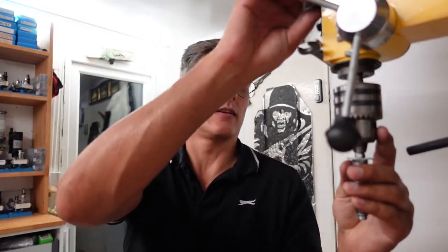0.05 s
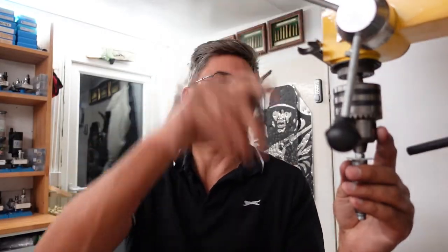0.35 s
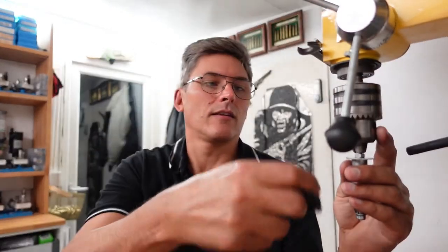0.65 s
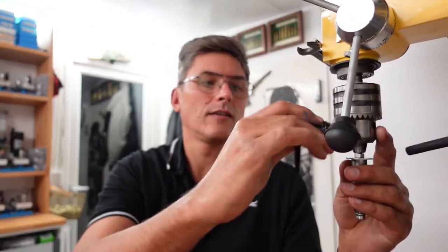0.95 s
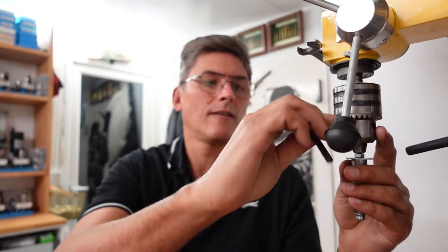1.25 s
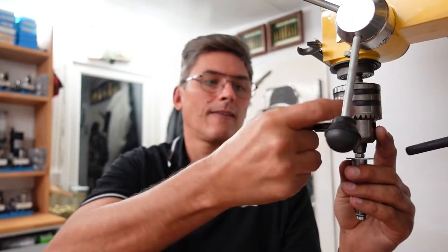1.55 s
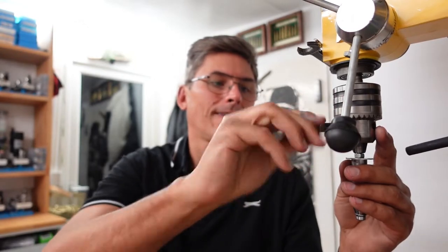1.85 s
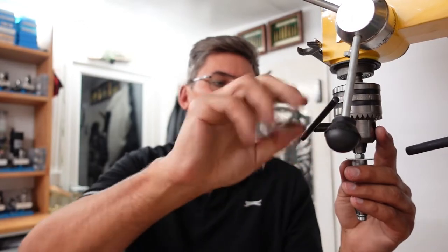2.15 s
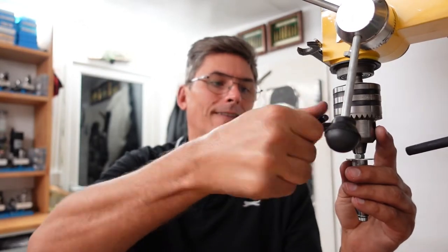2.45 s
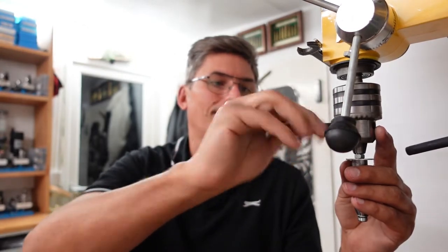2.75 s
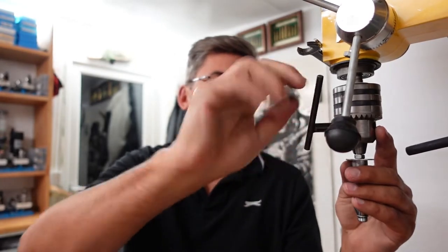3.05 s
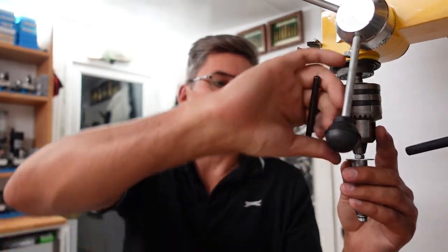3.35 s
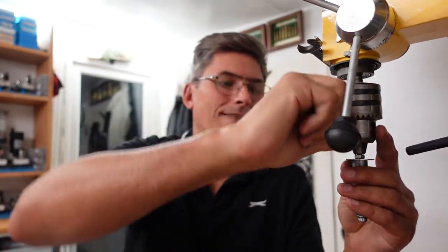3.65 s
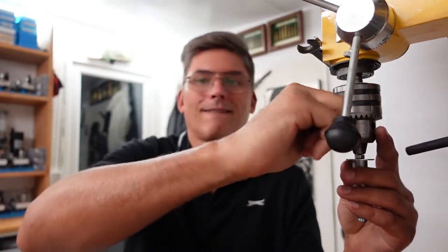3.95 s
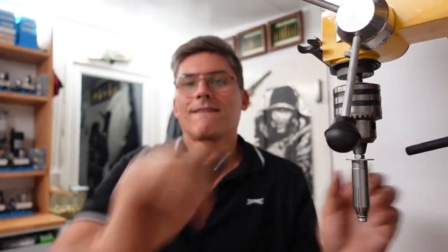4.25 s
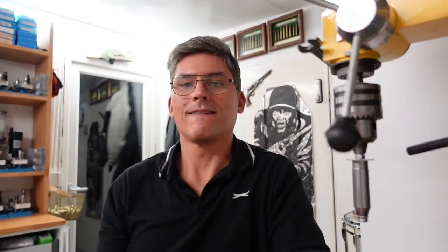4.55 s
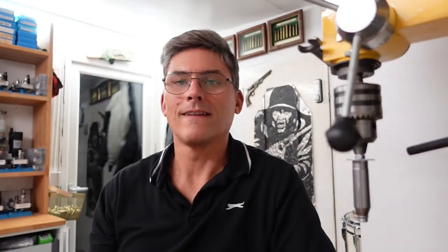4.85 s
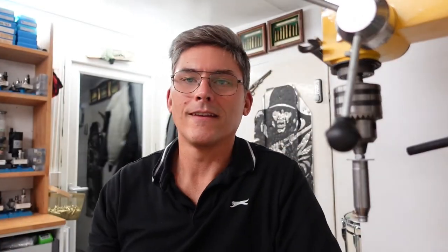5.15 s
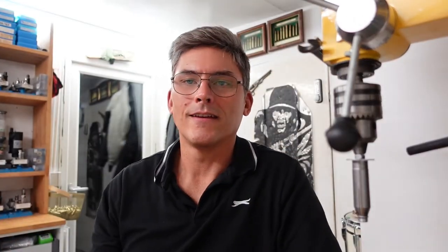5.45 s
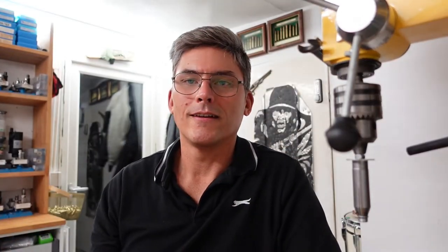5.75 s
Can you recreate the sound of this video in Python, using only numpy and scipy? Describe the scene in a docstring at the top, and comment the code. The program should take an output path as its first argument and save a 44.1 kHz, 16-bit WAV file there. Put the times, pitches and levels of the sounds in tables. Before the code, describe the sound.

In a small workshop with a faint hum, a metal handle clacks, then a drill chuck is tightened by hand close to the microphone. Bright, ringing clicks of the steel key come in uneven bursts over dull knocks from the machine, growing heavier and duller with the last turns. The key scrapes briefly, and hands settle with a soft thump and a brush of clothing.

```python
"""A steel key clicks and rings against the teeth of a drill press chuck, tightening it turn by turn.
Each impact excites damped modes of key and chuck, duller as the jaws grip the bolt; the key's pin
scrapes in its socket, and the machine's head thuds under each push. The feed handle clacks at the
start; near the end a hand slides on the key, and later cloth brushes as the hands settle. The walls
of the small workshop answer briefly, over still air and a faint hum."""
import sys
import numpy as np
from scipy import signal
from scipy.fft import rfft, irfft, next_fast_len
from scipy.io import wavfile
from scipy.ndimage import uniform_filter1d

SR = 44100
rng = np.random.default_rng(int(sys.argv[2]) if len(sys.argv) > 2 else 0)


def dump(signal):
    """Clip the signal to [-1, 1] and save it as 16-bit WAV at the path in sys.argv[1]."""
    limited = np.clip(np.atleast_2d(signal).T, -1, 1)
    pcm = np.round(limited * 32767).astype(np.int16)
    wavfile.write(sys.argv[1], SR, pcm)


N = 260222
TIME = np.arange(N) / SR  # the whole scene [s]
T = np.arange(SR // 2) / SR  # one event [s]

# Levels in all tables are relative: each source adds its own gain.
# the key's teeth strike the chuck's: (time [s], click level [dB], chatter [s], ring level [dB])
TOOTH_STRIKES = [ (1.0332, -17, .005, -25.5), (1.0515, -14, 0.005, -10), (1.1777, -14.5, 0.0042, -22),
                 (1.1873, -13, 0.003, -15.5), (1.2983, -27, 0.00095, -43), (1.3376, -35.5, 0.0046, -60),
                 (1.3635, -16, 0.0069, -14), (1.3752, -14.5, 0.0027, -13.5), (1.4025, -21, 0.0035, -13.5),
                 (1.4474, -16.5, .005, -20.5), (1.468, -8, 0.0027, -33), (1.4811, -15.5, 0.011, -18),
                 (1.5018, -19, 0.0077, -12.5), (1.5162, -11.5, 0.0056, -16.5),
                 (1.5274, -21.5, 0.00084, -19), (1.882, -18.5, 0.0048, -18), (1.8954, -17.5, 0.0013, -17),
                 (1.92, -19.5, 0.0035, -20), (1.94, -16.5, 0.0024, -22), (1.9584, -11, 0.00046, -11.5),
                 (2.136, -39.5, .003, -70), (2.301, -25, 0.0016, -37), (2.324, -14.5, 0.0013, -23),
                 (2.3448, -13.5, 0.0024, -31), (2.3665, -17, 0.0038, -17.5), (2.517, -21.5, 0.0018, -42),
                 (2.7156, -28.5, 0.0023, -45), (2.7741, -23, 0.004, -19), (2.7981, -18.5, 0.0034, -19.5),
                 (2.8219, -19, 0.0069, -18.5), (3.215, -34.5, 0.0024, -55), (4.0815, -26, 0.0038, -32.5)]
# the jaws bite into the bolt, ending each of the last turns: (time [s], clunk level [dB])
JAW_BITES = [(2.3914, -21.5), (2.8682, -19.5), (3.2254, -26), (3.2762, -30.5), (3.2943, -24.5),
             (3.3643, -30), (3.3945, -35.5)]


def amp(db):
    """Amplitude ratio of a level in decibels."""
    return 10 ** (np.asarray(db) / 20)


def unit(x):
    """Normalisation to rms 1."""
    return x / np.sqrt(np.mean(x ** 2) + 1e-20)


def along(points, hz):
    """Interpolation of (frequency, value) points on a logarithmic frequency axis."""
    freqs, values = np.transpose(points)
    return np.interp(np.log(hz + 1), np.log(freqs + 1), values)


def filtered(x, response):
    """Linear filtering: the spectrum is multiplied by a frequency response."""
    n = x.shape[-1]
    padded = next_fast_len(n + 4096)
    return irfft(rfft(x, padded) * response(np.fft.rfftfreq(padded, 1 / SR)), padded)[..., :n]


def noise(spectrum, size):
    """Spectral shaping turns white noise into coloured noise of rms 1."""
    return unit(filtered(rng.standard_normal(size), lambda hz: amp(along(spectrum, hz))))


def fade(t60, attack, hold=0):
    """Exponential damping, after a quick rise and a hold while the surfaces chatter (all in seconds)."""
    return np.exp(-np.log(1000) * np.maximum(T - hold, 0) / t60) * (1 - np.exp(-T / attack))


def burst(spectrum, t60, attack, hold=0):
    """Modal overlap: countless damped modes are heard as one dying noise."""
    return noise(spectrum, len(T)) * fade(t60, attack, hold)


def ring(modes, attack, scatter_db, stretch=1, looseness=1):
    """Modal superposition: each blow shares its energy anew, and loose contact scatters the phases."""
    hz, db, t60 = np.transpose(modes)[:, :, None]
    gain = amp(db + scatter_db * rng.standard_normal(hz.shape))
    phase = looseness * rng.uniform(-np.pi, np.pi, hz.shape)
    partials = gain * fade(t60, attack) * np.sin(2 * np.pi * hz * stretch * T + phase)
    return unit(partials.sum(axis=0)) / 10


def swells(strokes):
    """Amplitude envelope of rubbing: one Gaussian pulse for each stroke."""
    return sum(amp(db) * np.exp(-.5 * ((TIME - s) / width) ** 2) for s, db, width in strokes)


def add(track, s, sound):
    """Superposition of a sound on the track at time s."""
    start = max(round(s * SR), 0)
    part = track[..., start:start + sound.shape[-1]]
    part += sound[..., :part.shape[-1]]


def grip(s):
    """Clamping of the bolt by the jaws at time s."""
    # firmness of the hold: (time [s], grip [0-1])
    firmness = [(1.0, 0.45), (1.9, 0.28), (2.35, 0.55), (2.8, 1), (3.3, 0.6)]
    return np.interp(s, *np.transpose(firmness))


def coupled_level(s, click_db, offset_db, slope, grip_db):
    """Coupling: the level a tooth excites depends on the strength of its click and on the grip."""
    firm_click_db = -16
    return click_db + offset_db + slope * (click_db - firm_click_db) + grip_db * grip(s)


def room_tone():
    """Ambient noise floor, as mid and side: still air and a faint hum with slight phase modulation."""
    # spectrum of the still room: (frequency [Hz], level [dB])
    air = [(25, -38), (50, -26), (75, -15), (100, -3), (125, -9), (220, -5), (340, -10), (620, -11),
           (1070, -15), (2050, -19), (3800, -25.5), (8000, -30), (16000, -34)]
    waver = np.interp(TIME, np.arange(0, 7, .1), rng.standard_normal(70))
    hum = amp(-61) * np.sin(2 * np.pi * 100 * TIME + 0.52 * waver)
    return np.array([amp(-53.5) * noise(air, N) + hum, amp(-48) * noise(air, N)])


def in_room(sound, wet_db):
    """Reverberation: convolution with decaying noise adds the walls' reflections, as mid and side."""
    # reverberation time of the workshop: (frequency [Hz], t60 [s])
    walls = [(100, 0.56), (260, 0.33), (700, 0.4), (1800, 0.32), (5000, 0.32), (13000, 0.35)]
    hz, t, spectra = signal.stft(rng.standard_normal((2, len(T))), SR, nperseg=256)
    decay = np.exp(-np.log(1000) * t / along(walls, hz)[:, None])
    tail = signal.istft(spectra * decay, SR, nperseg=256)[1][:, :len(T)]
    # the column and the nearest wall answer first and strongest
    tail = tail * (1 - np.exp(-T / 0.0017)) * (1 + 1.11 * np.exp(-T / 0.011))
    tail /= np.linalg.norm(tail[0])
    mid, side = amp(wet_db) * signal.fftconvolve(sound[None], tail, axes=1)[:, :len(T)]
    return np.array([sound + mid, side])


def hands():
    """Friction and soft impact: a hand slides on the key; later cloth brushes as the hands settle."""
    # spectra of a rubbing hiss, a soft thump and rustling cloth: (frequency [Hz], level [dB])
    hiss = [(2000, -7), (4500, -7.5), (7500, -6), (10000, -4), (15000, -8.5)]
    soft_thump = [(30, -24), (55, -10), (78, 5), (150, -4), (260, -3.5), (450, -21), (900, -31),
                  (4000, -60)]
    cloth = [(250, -19), (700, 4.5), (1700, 7.5), (3500, 4.5), (6000, -1), (10000, -11), (16000, -11)]
    # a hand slides on the key, later cloth brushes: (time [s], level [dB], width [s])
    rubs = [(3.50, -48.5, 0.036), (4.82, -57, 0.2)]
    # hands come to rest on the lap: (time [s], thump level [dB], rustle level [dB], t60 [s])
    landings = [(4.614, -72, -41, 0.17), (4.724, -31, -76, 0.16), (4.752, -40, -54, 0.4),
                (4.83, -38.5, -38, 0.3)]
    out = np.zeros((2, N))
    out[0] = noise(hiss, N) * swells(rubs)
    for s, thump_db, rustle_db, t60 in landings:
        thump = amp(thump_db) * burst(soft_thump, t60, attack=0.0023)
        rustle = amp(rustle_db) * burst(cloth, t60, attack=0.0048)
        add(out, s, in_room(thump + rustle, wet_db=-6))
    return out


def pin_scrape():
    """Stick-slip friction: the key's pin moves in its socket by many tiny slips."""
    # slides of the pin: (time [s], level [dB], width [s])
    slides = [(1.17, -40, 0.015), (4.073, -41, 0.021), (4.124, -45.5, 0.021)]
    # spectrum of the scrape: (frequency [Hz], level [dB])
    friction = [(200, -31), (400, -1), (560, 6.5), (750, 5.5), (1300, -8), (1800, -2), (2350, 1),
                (3200, -10), (5000, -1.5), (7200, -8.5), (10000, -9), (16000, -17)]
    slips = np.abs(uniform_filter1d(rng.exponential(size=N) ** 4, size=40)) ** .5
    scrape = swells(slides) * unit(slips * noise(friction, N))
    out = np.zeros((2, N))
    for s in np.arange(0, N / SR, .25):  # short pieces leave space for each one's tail
        piece = scrape[round(s * SR):][:SR // 4]
        add(out, s, in_room(np.pad(piece, (0, len(T) - len(piece))), wet_db=3))
    return out


def feed_handle():
    """Impact excitation: the handle spins back and rattles against its stop, and its rods ring freely."""
    # whir of the spinning hub: (time [s], level [dB])
    spin = [(0, -36), (.03, -40), (.06, -44), (.11, -43), (.16, -50), (.3, -120)]
    # spectra of the hub and of a blow on the stop: (frequency [Hz], level [dB])
    hub = [(30, -38), (90, -14), (150, 1), (600, -6), (1000, -16), (1450, -7), (1620, 5), (1800, -8),
           (1990, -5), (2200, -5.5), (3100, -11.5), (3450, -0.5), (3900, -11), (4700, -13), (7000, -21.5),
           (15000, -27)]
    stop = [(200, -21), (500, -12), (1000, -6.5), (1600, 1), (2400, 1), (3400, -12.5), (4800, -5.5),
            (7000, -12.5), (9000, -20.5), (16000, -27)]
    # knocks on the stop: (time [s], clack level [dB], ring level [dB], chatter [s])
    knocks = [(0.0658, -30, -36, 0.003), (0.0886, -29.5, -50, 0.00042), (0.1153, -11.5, -27, 0),
              (0.124, -15, -16, 0.0028), (0.1465, -11, -20, 0), (0.152, -12, -28, 0),
              (0.1627, -9, -25, 0.0032)]
    # modes of the rods: (frequency [Hz], level [dB], t60 [s])
    rod_modes = [(572, -1, 0.14), (1586, 4.5, 0.25), (1634, -4, 0.26), (2004, 1, 0.37), (2100, -8, .14),
                 (2490, 7, 0.12), (3400, -20, 0.22), (3600, -28, 0.35), (4480, -4, 0.18)]
    out = np.zeros((2, N))
    out[0] = amp(np.interp(TIME, *np.transpose(spin))) * noise(hub, N)
    for s, clack_db, ring_db, chatter in knocks:
        clack = amp(clack_db - 5) * burst(stop, t60=0.031, attack=.0002, hold=chatter)
        rods = amp(ring_db - 7) * ring(rod_modes, attack=0.00053, scatter_db=2.5)
        add(out, s, in_room(clack + rods, wet_db=-5))
    return out


def thud(db, upper_db):
    """Free vibration of the whole head after one jolt, pitched a little differently each time."""
    # low and upper modes of the head: (frequency [Hz], level [dB], t60 [s])
    low_modes = [(89.5, -16, 0.33), (125, -4, 0.13), (152.9, 0.5, 0.13), (185.7, 0, 0.1),
                 (223.1, 0.5, 0.11)]
    upper_modes = [(274.5, -7.5, 0.16), (378.7, -2, 0.14), (433.7, -2, 0.13), (506, -14.5, 0.2)]
    detune = np.exp(.03 * rng.standard_normal())
    low = amp(-5) * ring(low_modes, attack=0.0071, scatter_db=1.5, stretch=detune, looseness=0.61)
    upper = amp(upper_db - 3.5) * ring(upper_modes, attack=0.01, scatter_db=3.5)
    return in_room(amp(db) * (low + upper), wet_db=-5.5)


def machine_head():
    """Structure-borne sound: each shove, tooth and bite takes up play in the spindle and jolts the head."""
    # the hands shove the head: (time [s], level [dB])
    shoves = [(0.004, -31), (0.125, -20.5), (0.402, -31.5), (1.182, -13), (1.273, -20.5), (1.364, -11),
              (1.456, -15), (1.505, -11), (1.883, -15.5), (2.303, -17.5), (2.373, -13.5), (2.748, -19.5),
              (2.81, -15.5), (2.884, -17), (3.407, -18), (3.661, -24), (4.053, -17), (4.091, -18),
              (4.154, -25)]
    lag_s, low_cut_hz = 0.00402, 60
    out = np.zeros((2, N))
    jolts = [(s + lag_s, coupled_level(s, db, offset_db=-8, slope=-0.55, grip_db=2.4))
             for s, db, _, _ in TOOTH_STRIKES]
    for s, db in list(shoves) + jolts:
        # a tighter chuck passes on more of the upper modes
        add(out, s, thud(db, upper_db=-21 + 8.5 * grip(s)))
    for s, db in JAW_BITES:
        add(out, s + lag_s, thud(db + 8, upper_db=-6.5))
    # the casting radiates little of its slowest motion
    return filtered(out, lambda hz: (1j * hz / (low_cut_hz + 1j * hz)) ** 2)


def steel_contact(s, chatter, click_db, treble_db, clunk_db, ring_db):
    """Impact of steel on steel: a noisy transient and the damped modes of sleeve, chuck and key."""
    # spectra of the impact's click, treble and clunk: (frequency [Hz], level [dB])
    click_band = [(500, -27), (1200, -4.5), (1800, 2), (2800, 1), (3600, -1), (5200, 0), (6500, -6.5),
                  (8500, -12.5), (15000, -40)]
    treble_band = [(4000, -28), (7000, 7), (8400, 2), (9700, -0.5), (11200, 3), (12000, -1), (13300, 5),
                   (14000, -17), (16000, -32)]
    clunk_band = [(150, -20), (330, -1), (550, -2), (800, -1.5), (1400, 2.5), (2000, -6.5), (3500, -39)]
    # modes of the toothed sleeve and of the chuck with its spindle: (frequency [Hz], level [dB], t60 [s])
    sleeve_modes = [(7860, 5, .08), (8580, 9.5, 0.12), (10800, -14, 0.111), (10500, 3, .13),
                    (11300, 8, 0.14), (11600, 1, .13), (12100, 0, 0.08), (12400, -4, .16),
                    (12600, 10.5, 0.125), (13900, -4, 0.099), (13300, 2, 0.12), (13220, -7, 0.071)]
    chuck_modes = [(712.2, 12.5, 0.3), (910, -11, 0.077), (1131, -34, 0.13), (1366, 24, 0.11),
                   (1500, -18.5, 0.34), (1620, 6, 0.48), (1650, 8.5, 0.37), (1724, -6, 0.26),
                   (2130, -33, .18), (2447, 15.5, 0.1), (2620, -26.5, 0.164)]
    # a cluster of the key's close modes: (frequency ratio [1], level [dB], t60 [s])
    key_modes = [(.976, -0.5, 0.045), (.982, -4.5, 0.19), (.989, -1.5, 0.25), (.999, -3.5, 0.43),
                 (1.009, -2.5, 0.16), (1.017, -5, 0.091), (1.027, -2, 0.12), (1.04, -10, .15),
                 (1.058, -4.5, .11)]
    # each hold of the fingers retunes the key: (start [s], ring [Hz], overtone [Hz], overtone level [dB])
    holds = [(1.0, 6940, 9100, -6.5), (1.15, 6910, 9430, -2.5), (1.32, 7046, 9070, -15.5),
             (1.43, 7040, 9430, -9), (1.8, 7200, 9500, -10), (2.2, 7010, 9400, -18),
             (2.65, 7020, 9300, -36)]
    _, ring_hz, overtone_hz, overtone_db = holds[sum(s >= hold[0] for hold in holds[1:])]
    click = amp(click_db - 7) * burst(click_band, t60=.022, attack=0.00054, hold=chatter)
    treble = burst(treble_band, t60=.022, attack=0.00017, hold=chatter)
    sleeve = amp(-8) * ring(sleeve_modes, attack=0.00048, scatter_db=0)
    clunk = burst(clunk_band, t60=0.1, attack=0.0012, hold=chatter)
    chuck = amp(-3.5) * ring(chuck_modes, attack=0.00031, scatter_db=5.5)
    impact = click + amp(treble_db) * (treble + sleeve) + amp(clunk_db - 4) * (clunk + chuck)
    rise = 0.00022 + 0.22 * chatter  # longer chatter builds the ring more slowly
    bending = ring(key_modes, attack=rise, scatter_db=5, stretch=ring_hz)
    overtone = amp(overtone_db) * ring(key_modes, attack=rise, scatter_db=9, stretch=overtone_hz)
    finger_damping = 0.2 + 1.73 * np.exp(-T / 0.0075)
    key_ring = amp(ring_db - 3.5) * finger_damping * (bending + overtone)
    return in_room(impact + key_ring, wet_db=-3)


def chuck_key():
    """Impacts of meshing teeth: brighter when harder, heavier as the grip grows; bites mostly clunk."""
    out = np.zeros((2, N))
    for s, click_db, chatter, ring_db in TOOTH_STRIKES:
        treble_db = coupled_level(s, click_db, offset_db=-12, slope=0.67, grip_db=-6)
        clunk_db = coupled_level(s, click_db, offset_db=-16, slope=-0.33, grip_db=8)
        add(out, s, steel_contact(s, chatter, click_db, treble_db, clunk_db, ring_db))
    for s, db in JAW_BITES:
        bite = steel_contact(s, chatter=.002, click_db=db - 1.5, treble_db=db - 28,
                             clunk_db=db, ring_db=db - 22)
        add(out, s, bite)
    return out


def scene():
    """Mid-side stereo: the sources sum near the centre, and a level difference leans them to the right."""
    # gain of the side signal: (frequency [Hz], level [dB])
    spread = [(120, -12.5), (600, -9), (2500, -9), (8000, -8.5), (13000, -11)]
    # left over right: (frequency [Hz], level difference [dB])
    lean = [(100, 1.1), (250, 1), (600, -2), (1500, -3.5), (4000, -2.4), (9000, -1.5), (13000, 0.5)]
    mid, side = feed_handle() + chuck_key() + pin_scrape() + machine_head() + hands() + room_tone()
    side = filtered(side, lambda hz: amp(along(spread, hz)))
    stereo = np.array([mid + side, mid - side])
    return filtered(stereo, lambda hz: amp(np.outer([.5, -.5], along(lean, hz))))


def record(dry):
    """Band limiting: an ideal low-pass filter removes the highest treble."""
    return filtered(dry, lambda hz: hz < 16200)


dry = scene()
out = record(dry)
dump(out)
```